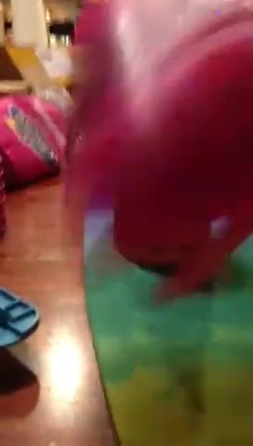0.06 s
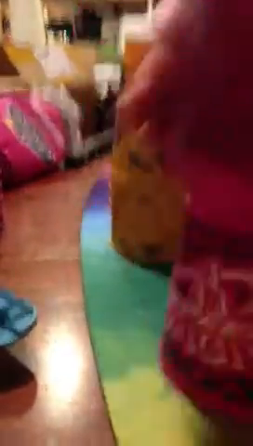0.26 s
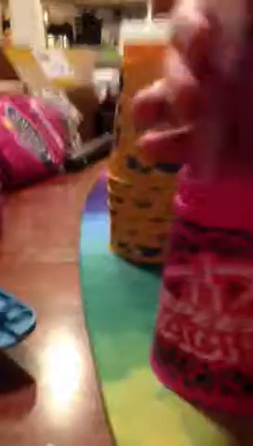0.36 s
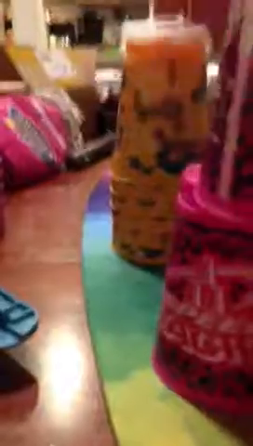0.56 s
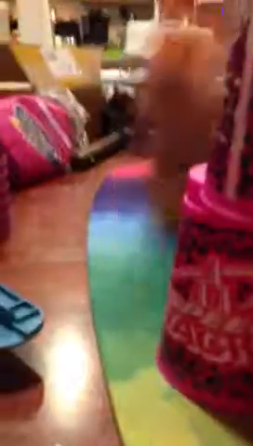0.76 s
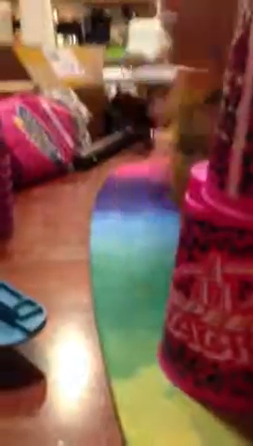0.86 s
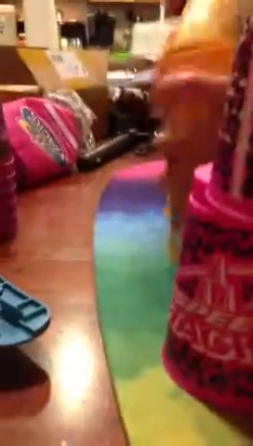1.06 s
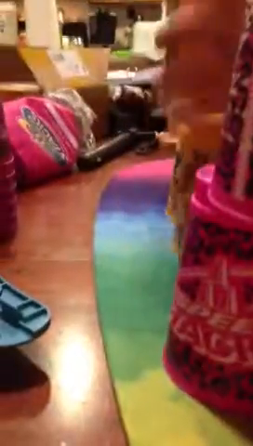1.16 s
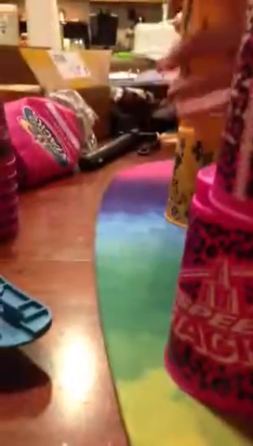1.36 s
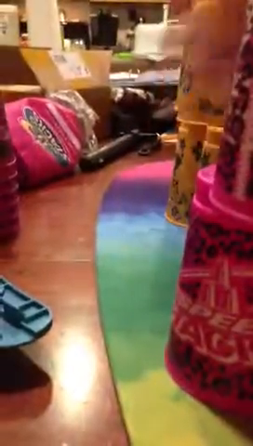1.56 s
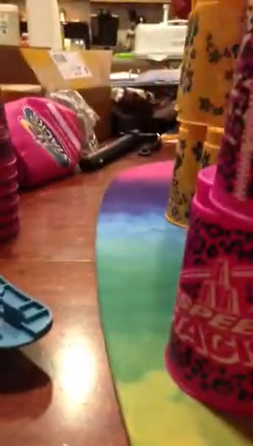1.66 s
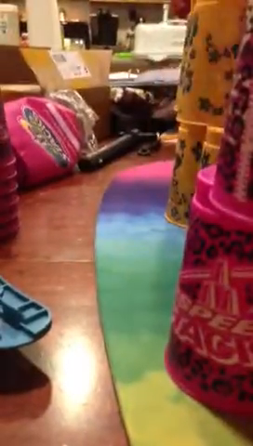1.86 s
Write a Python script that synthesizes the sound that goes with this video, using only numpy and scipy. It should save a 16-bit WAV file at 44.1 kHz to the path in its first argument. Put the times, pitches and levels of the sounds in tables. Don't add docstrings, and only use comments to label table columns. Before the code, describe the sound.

Hands quickly work plastic cups on a table indoors; they scrape and pop apart, slam down, fall briefly quieter with muffled thumps, then drop together loudly a little farther away, over faint room hush.

```python
import sys
import numpy as np
from scipy import signal
from scipy.fft import rfft, irfft
from scipy.io import wavfile
from scipy.ndimage import uniform_filter1d

SR = 44100
rng = np.random.default_rng(int(sys.argv[2]) if len(sys.argv) > 2 else 0)


def invert_db(level):
    return 10 ** (np.asarray(level, dtype=float) / 20)


def inscribe(sig):
    pcm = np.round(np.clip(np.atleast_2d(sig).T, -1, 1) * 32767)
    wavfile.write(sys.argv[1], SR, pcm.astype(np.int16))


N = 83790


def evened(x):
    return x / np.sqrt(np.mean(x ** 2) + 1e-20)


def read(points, hz):
    f, value = np.transpose(points)
    return np.interp(np.log(hz + 1), np.log(f + 1), value)


def add(mix, s, sound):
    at = round(s * SR)
    sound = sound[max(-at, 0):]
    part = mix[max(at, 0):][:len(sound)]
    part += sound[:len(part)]


def ring(hz, t60, t, rise_s):
    swell = (1 - np.exp(-t / rise_s)) ** 2
    return swell * invert_db(-60 * t / t60) * np.sin(2 * np.pi * hz * t)


def band(x, hz, width_hz):
    return signal.lfilter(*signal.iirpeak(hz, hz / width_hz, SR), x)


def filtered(x, order, hz, kind):
    return signal.sosfilt(signal.butter(order, hz, kind, fs=SR, output="sos"), x)


# f/Hz, level/dB per Hz
HUSH_COLOUR = [(59, -57), (100, 0), (293, -12), (552, -5), (2000, -11.5), (2520, -14.5), (5170, -13.5),
               (15500, -26.5)]


def air():
    hush_db, whine_db = -58, -72
    whine_hz, whine_width_hz = 6340, 230
    hz = np.fft.rfftfreq(N, 1 / SR)
    hush = irfft(rfft(rng.standard_normal(N)) * invert_db(read(HUSH_COLOUR, hz)), N)
    whine = band(rng.standard_normal(N), whine_hz, whine_width_hz)
    whine = band(whine, whine_hz, whine_width_hz)
    return invert_db(hush_db) * evened(hush) + invert_db(whine_db) * evened(whine)


# start t/s, length/s, level/dB, centre f/Hz, wide hiss level/dB
SLIDES = [(-.02, 0.054, -42.5, 4060, -0.5), (0.067, 0.019, -42.5, 5370, 1), (0.183, 0.04, -35.5, 4730, 1.5),
          (0.206, 0.035, -31, 6850, 1), (0.276, 0.035, -33, 5500, 1), (0.315, 0.02, -34.5, 3770, -12),
          (0.701, 0.17, -53.5, 2400, -10), (0.781, 0.032, -41, 6500, 1), (0.809, 0.076, -50.5, 5800, 1),
          (0.862, 0.09, -45, 4500, 3), (1.012, 0.075, -54, 5070, 1), (1.21, 0.095, -50.5, 3270, 0),
          (1.082, 0.07, -50.5, 3440, -26)]


def slides():
    fall, width = 0.4, 0.3
    lean, grit_db = 0.78, 3.5
    out = np.zeros(N)
    for s, length, db, hz, wide_db in SLIDES:
        noise, grit = rng.standard_normal((2, 5000))
        n = min(round(length * SR), 5000)
        u = np.arange(n) / n
        scrape = noise * invert_db(grit_db * evened(uniform_filter1d(grit, 60)))
        upper = evened(band(scrape, hz * (1 + fall / 2), width * hz))[:n]
        lower = evened(band(scrape, hz * (1 - fall / 2), width * hz))[:n]
        hiss = evened(np.diff(scrape, prepend=0))[:n]
        sound = (1 - u) * upper + u * lower + invert_db(wide_db) * hiss
        sound = filtered(sound, 2, [0.25 * hz, 13500], "band")
        add(out, s, invert_db(db) * np.sin(np.pi * u ** lean) ** 0.87 * sound)
    return out


# t/s, peak level/dB, low tone f/Hz, high tone f/Hz, high tone level/dB against low
UNSTACK_KNOCKS = [(-0.002, -20, 362, 610, -2.5), (0.033, -16, 378, 778, -10), (0.047, -19.5, 590, 610, -30),
                  (0.089, -21, 590, 630, -13.5), (0.101, -24.5, 320, 865, 1.5),
                  (0.129, -23.5, 583, 610, -20), (0.155, -21, 255, 640, -31), (0.166, -26, 300, 606, -7),
                  (0.24, -16, 410, 680, -10), (0.249, -13, 550, 717, -10), (0.299, -9, 373, 720, -21),
                  (0.325, -5.5, 436, 692, -9), (0.342, -19, 378, 690, -3), (0.368, -19, 357, 716, -38),
                  (0.444, -7.5, 467, 676, -2.5)]
SLAM_KNOCKS = [
    (0.2601, -4.5, 481, 703, 0),
    (.4598, -18, 450, 702, 12),
    (0.4642, 3, 551, 831, -5.5),
    (.4707, -8.5, 638, 835, -0.5),
    (0.484, -20.5, 635, 1020, -0.5),
]
RIM_KNOCKS = [(.012, -32, 447, 790, -9), (.1, -34, 950, 1064, -2.5), (.2605, -17.5, 1710, 1486, -0.5),
              (.327, -23, 1010, 1390, -13), (.358, -29, 560, 1000, -13), (.462, -24, 1570, 1850, 5),
              (.86, -36, 505, 1010, -12), (1.11, -29, 1000, 2120, -9.5), (1.23, -34.5, 680, 1900, -4),
              (1.264, -41, 1650, 2440, -2), (1.448, -21, 1220, 3320, -5.5), (1.449, -16, 400, 1900, -9),
              (1.613, -21.5, 1170, 2146, 0)]
MAT_KNOCKS = [(0.745, -34, 188, 527, -7), (0.765, -24, 200, 546, -8.5), (0.79, -14.5, 240, 670, -15.5),
              (0.804, -27.5, 277, 510, -5), (0.815, -28, 210, 493, -16), (0.855, -35, 287, 560, -13),
              (0.9, -41, 514, 532, 12), (0.912, -42, 488, 757, 13.5), (0.926, -26.5, 253, 798, 3),
              (0.948, -31.5, 221, 687, 1.5), (0.958, -27, 262, 808, -5.5), (1.071, -30, 406, 467, -15),
              (1.109, -5, 398, 538, -11.5), (1.12, -20.5, 374, 693, -2), (1.158, -20.5, 223, 500, -4),
              (1.23, -14, 297, 609, -2), (1.238, -17.5, 293, 510, -6.5), (1.266, -28.5, 480, 633, 1.5),
              (1.286, -25, 460, 474, -10), (1.315, -36, 202, 616, -30), (1.345, -23, 364, 510, -36),
              (1.37, -30, 200, 492, -27)]
STACK_KNOCKS = [(1.447, -1.5, 553, 810, -7), (1.46, -4.5, 504, 822, -5), (1.474, -9.5, 572, 672, -5),
                (1.485, -25, 596, 830, 6), (1.494, -7.5, 506, 666, -8), (1.505, -8.5, 522, 829, -6.5),
                (1.528, -20, 635, 815, -9), (1.567, -19.5, 500, 830, -6.5), (1.612, -0.5, 558, 740, -2),
                (1.616, -6.5, 580, 823, 2.5), (1.625, -7.5, 523, 825, 0.5), (1.756, -39, 500, 804, 8)]


def knocks():
    low_t60, high_t60 = 0.022, 0.033
    low_rise_s, high_rise_s = 0.0007, 0.00028
    lag_s = 0.00067
    out, t = np.zeros(N), np.arange(4000) / SR
    hits = [*UNSTACK_KNOCKS, *SLAM_KNOCKS, *RIM_KNOCKS, *MAT_KNOCKS, *STACK_KNOCKS]
    for s, db, low_hz, high_hz, high_db in hits:
        low = ring(low_hz, low_t60, t, low_rise_s)
        high = ring(high_hz, high_t60, t, high_rise_s)
        add(out, s + lag_s, invert_db(db) * (low + invert_db(high_db) * high))
    return out


# t/s, level/dB
HANDLING = [(0, -32), (.06, -39.5), (.19, -49.5), (.23, -48), (.3, -48), (.4, -44), (0.548, -73.5),
            (.74, -57), (0.798, -39.5), (.98, -55), (1.06, -69.5), (1.139, -34.5), (1.21, -70),
            (1.26, -32.5), (1.39, -61), (1.5, -40.5), (1.6, -43), (1.9, -64)]


def handling():
    rattles_per_s, t60, rise_s = 270, 0.057, 0.0007
    out, t = np.zeros(N), np.arange(3000) / SR
    size = invert_db(6.44 * np.minimum(rng.exponential(1, N), 4))
    size = size * (rng.random(N) < rattles_per_s / SR)
    pitch = rng.integers(0, 10, N)
    for k, hz in enumerate(np.geomspace(181, 745, 10)):
        out += signal.oaconvolve(size * (pitch == k), ring(hz, t60, t, rise_s))[:N]
    s, db = np.transpose(HANDLING)
    return invert_db(np.interp(np.arange(N) / SR, s, db)) * evened(out)


# f/Hz, t60/s
ROOM = [(150, 0.64), (500, 0.21), (1200, 0.34), (3000, 0.2), (7000, 0.14), (13000, 0.13)]


def room(x):
    start_s = 0.0043
    taps = np.zeros(SR)
    at = np.arange(0, SR - 20, 20)
    taps[at + rng.integers(0, 20, at.shape)] = rng.choice([-1., 1.], at.shape)
    hz, t, z = signal.stft(taps, SR, nperseg=256)
    decay = invert_db(-60 * t / read(ROOM, hz)[:, None])
    tail = signal.istft(z * decay, SR, nperseg=256)[1]
    tail = np.append(np.zeros(round(start_s * SR)), tail)
    return signal.fftconvolve(x, tail / np.linalg.norm(tail))[:N]


# t/s, peak level/dB, centre f/Hz, sizzle level/dB
UNSTACK_TICKS = [(0.0345, -29, 2250, -25), (0.0467, -27.5, 7800, 2), (0.0549, -27.5, 3270, -6),
                 (.073, -38, 6100, -8.5), (0.086, -27.5, 5070, -6), (0.1, -29.5, 1740, -20),
                 (0.1282, -36, 4300, -6), (0.1363, -29.5, 3170, -7.5), (0.1462, -41, 5000, -20),
                 (.195, -31, 4300, 2), (.2074, -19.5, 4600, -4), (.212, -30, 5450, -10),
                 (0.2285, -33, 4260, 11), (.233, -30, 7400, 3), (.2405, -35, 2530, -25),
                 (.2875, -22, 5640, -20), (.2915, -23.5, 6800, -10), (0.3261, -23, 1610, -24),
                 (.3265, -22, 4000, -26)]
SLAM_TICKS = [
    (0.2475, -17, 4560, -1.5),
    (0.2611, -16, 3300, -30),
    (0.2609, -12.5, 1650, -13),
    (0.4463, -24.5, 1880, -27),
    (0.46, -9, 5830, -9.5),
    (0.46, -12, 1750, -51),
    (0.4698, -14, 3700, -18),
    (1.448, -25, 4600, 6.5),
]
FAR_TICKS = [(0.782, -28.5, 8230, -9), (0.7865, -28, 5100, 5.5), (0.7914, -32, 7540, 6),
             (.797, -37, 4500, 0), (0.841, -48, 4450, -1), (0.853, -36.5, 3370, -4), (.8786, -46, 4590, 2),
             (.8875, -42, 5420, -10), (.905, -33.5, 4430, -12), (0.9135, -29.5, 4000, -17),
             (0.9495, -29.5, 3040, -12), (1.0392, -40.5, 5230, -17), (1.095, -61, 3830, 7),
             (1.1095, -45.5, 3870, 5), (1.2335, -30.5, 4100, -3), (1.2635, -35.5, 3020, -10),
             (1.4613, -28, 4700, -1), (1.4749, -29.5, 4600, -1), (1.4937, -30.5, 5140, -1),
             (1.5057, -32.5, 4570, -13), (1.5301, -35, 5070, 2), (1.6127, -12.5, 5020, -20),
             (1.6168, -13.5, 4250, -2)]
# f/Hz, level/dB
WALL = [(1700, 12.5), (2700, 5), (3400, 4.5), (4600, 6), (6200, 10), (8000, -12)]


def ticks():
    tone_t60, wall_t60, sizzle_t60 = 0.01, 0.02, 0.02
    wall_db, wall_width = -6.5, 0.16
    sizzle_hz, sizzle_rise_s = 5000, 0.0004
    out, t = np.zeros(N), np.arange(3000) / SR
    for s, db, hz, sizzle_db in [*UNSTACK_TICKS, *SLAM_TICKS, *FAR_TICKS]:
        noise, grit = rng.standard_normal((2, len(t)))
        buzz = noise * invert_db(3 * evened(uniform_filter1d(grit, 50)))
        tone = invert_db(-60 * t / tone_t60) * np.sin(2 * np.pi * hz * t)
        walls = np.zeros(len(t))
        for f, d in WALL:
            level = invert_db(d - 1.67 * abs(np.log2(f / hz)))
            walls += level * evened(band(buzz, f, wall_width * f))
        wall = 1.37 * evened(walls) + evened(band(buzz, hz, 0.22 * hz))
        body = 0.7 * tone + invert_db(wall_db - 60 * t / wall_t60) * wall
        body = filtered(body, 2, [0.4 * hz, min(2.2 * hz, 18000)], "band")
        sizzle = evened(filtered(buzz, 2, sizzle_hz, "high"))
        sizzle *= (1 - np.exp(-t / sizzle_rise_s)) * invert_db(sizzle_db - 60 * t / sizzle_t60)
        add(out, s, invert_db(db) * (body + sizzle))
    return out


# t/s, t60/s, level/dB, centre f/Hz
SETTLING = [
    (0.326, 0.16, -52, 4000),
    (0.461, 0.16, -46.5, 3430),
    (0.952, 0.17, -44.5, 1670),
    (1.449, 0.47, -39, 2800),
    (1.613, 0.45, -34, 2000),
]


def settling():
    out, t = np.zeros(N), np.arange(13000) / SR
    for s, t60, db, hz in SETTLING:
        shiver = evened(band(rng.standard_normal(len(t)), hz, 1.9 * hz))
        add(out, s, invert_db(db - 60 * t / t60) * shiver)
    return out


def scene():
    far_s, far_treble_hz, far_room_db = 1.35, 7000, 4
    pop_room_db, tick_room_db = -14, -14.5
    low = knocks() + handling()
    high = ticks() + slides() + settling()
    far = np.arange(N) > far_s * SR
    high = np.where(far, filtered(high, 2, far_treble_hz, "low"), high)
    echo = room(invert_db(pop_room_db) * low + invert_db(tick_room_db + far_room_db * far) * high)
    return (low + high + echo + air())[None]


def low_pass(x):
    return signal.sosfilt(signal.butter(12, 16310, fs=SR, output="sos"), x)


def record(dry):
    duck_db, recover_s = 3, 0.31
    skew = 0.04
    keep = np.exp(-1 / (recover_s * SR))
    load = signal.lfilter([1 - keep], [1, -keep], dry ** 2)
    x = dry * invert_db(-duck_db * np.sqrt(load / load.max()))
    x = filtered(x, 6, 121.2, "high")
    x = filtered(x, 1, 9230, "low")
    x = x + skew * x ** 2
    x = signal.sosfilt(signal.cheby2(8, 40, 15950, fs=SR, output="sos"), x)
    return low_pass(x)


dry = scene()
out = record(dry)
inscribe(out)
```